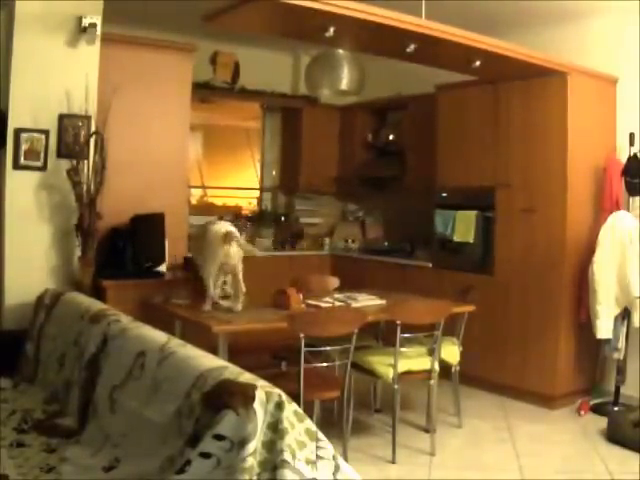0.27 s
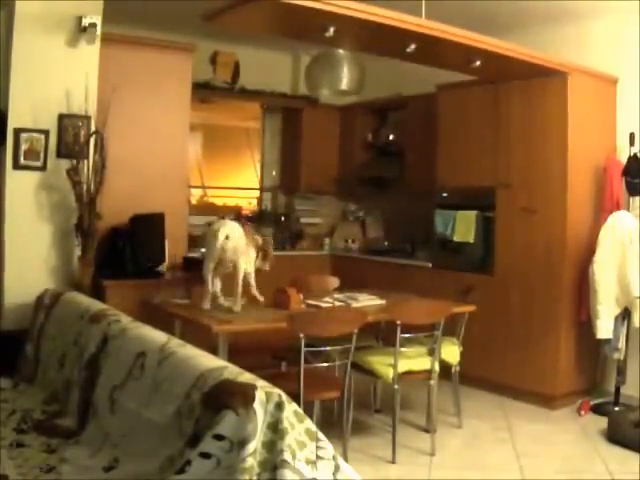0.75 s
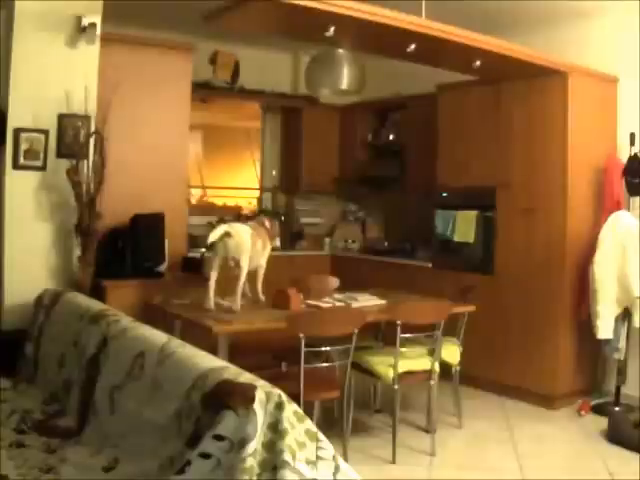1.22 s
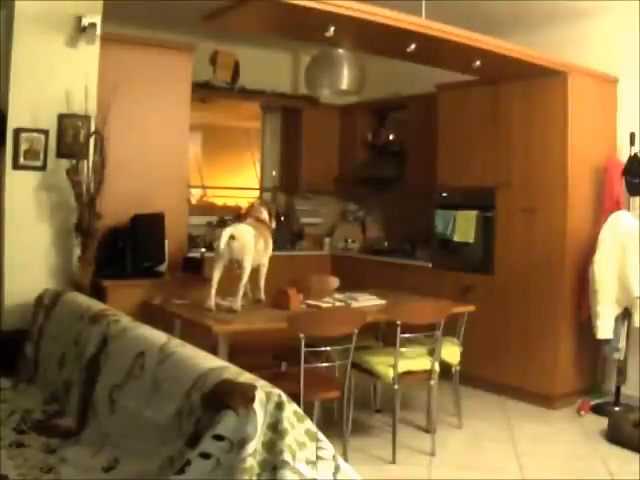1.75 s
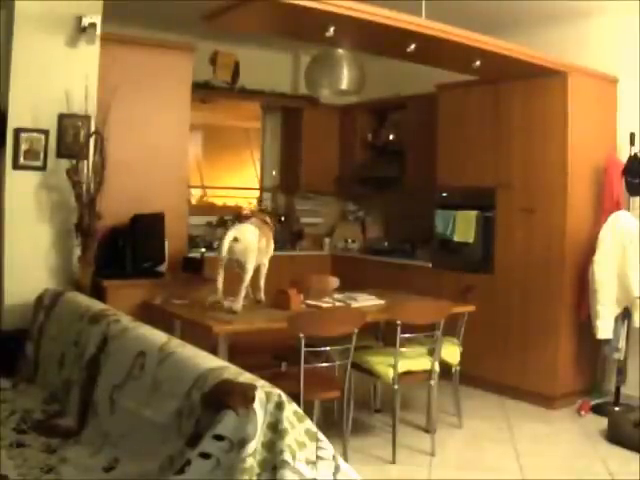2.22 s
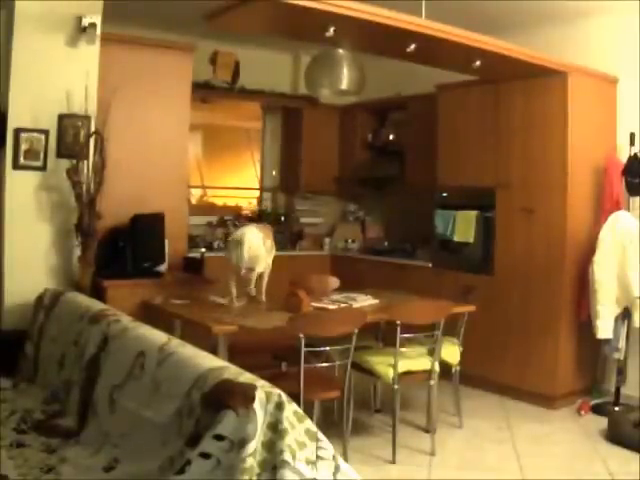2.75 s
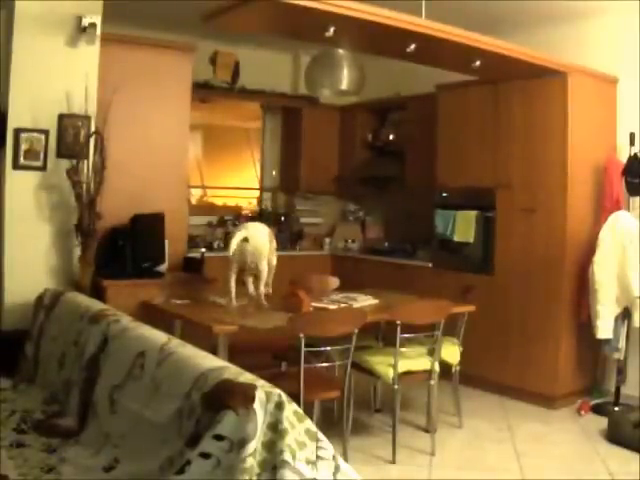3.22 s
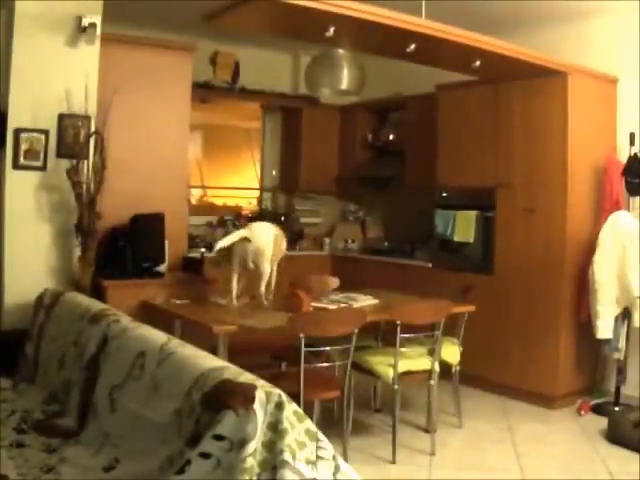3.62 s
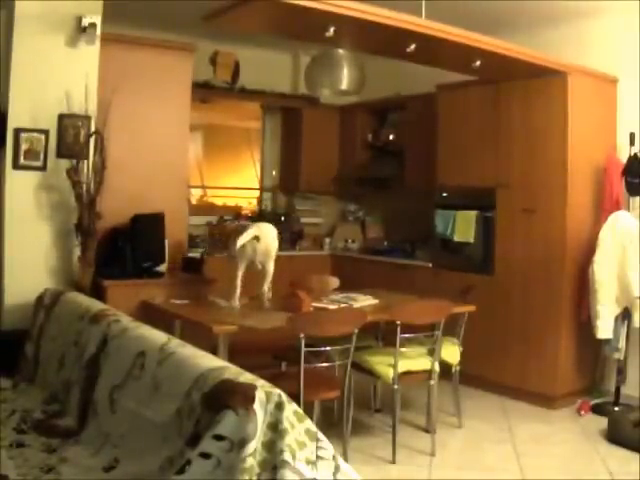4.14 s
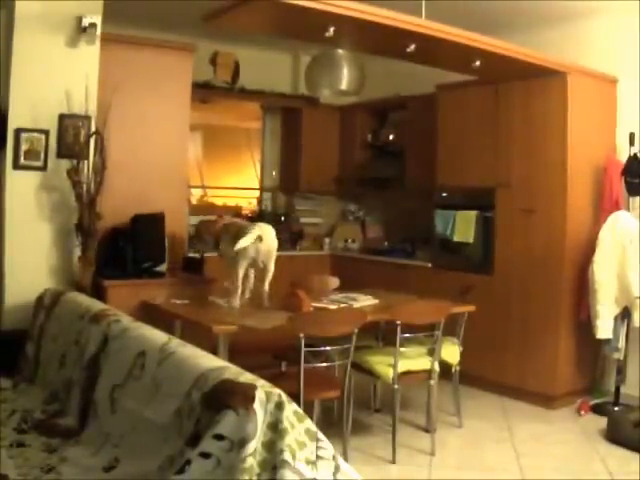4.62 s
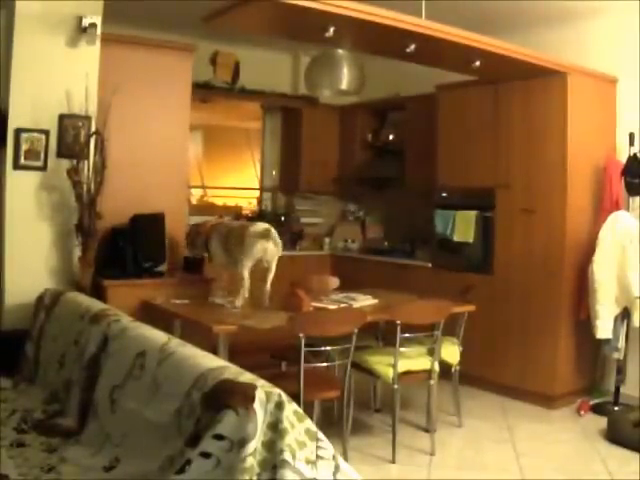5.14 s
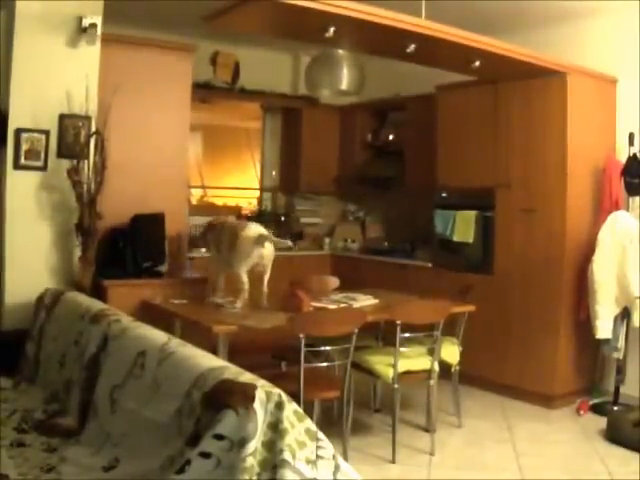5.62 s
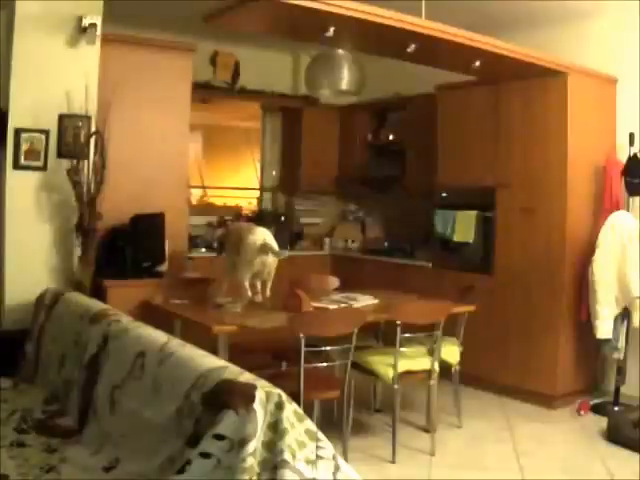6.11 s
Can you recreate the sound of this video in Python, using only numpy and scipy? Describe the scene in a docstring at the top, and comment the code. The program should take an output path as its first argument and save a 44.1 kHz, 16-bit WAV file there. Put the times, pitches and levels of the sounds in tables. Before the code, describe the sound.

A dog moves about on a wooden table, its claws clicking and its paws scuffing, with a faint jingle of its collar tag at first. It bumps and nudges things, with soft, low thumps from its paws. Louder knocks follow near the end, then a chink and a hollow object juddering across the wood. The microphone is several metres away in a quiet, slightly echoing kitchen with a faint hum.

```python
"""A dog moves about on a wooden table at the far side of a quiet, tiled kitchen and living room.
Over faint air and hum its claws click and scuff, its collar tag jingles and small things chink.
From 2.3 s it knocks and nudges things, and its paws make the furniture boom. More steps follow,
louder knocks from 5.3 s, and at 6 s it shoves a hollow thing that judders across the wood.
The microphone is metres away, so most of the sound comes by the walls."""
import sys
import numpy as np
from scipy import signal
from scipy.fft import rfft, irfft
from scipy.io import wavfile
from scipy.ndimage import uniform_filter1d

SR = 44100
rng = np.random.default_rng(int(sys.argv[2]) if len(sys.argv) > 2 else 0)


def bounce(signal):
    """Save signal as a 16-bit WAV file at the path given by the first command-line argument."""
    frames = np.transpose(np.atleast_2d(signal))
    limited = np.clip(frames, -1, 1)
    pcm = np.round(limited * 32767).astype(np.int16)
    wavfile.write(sys.argv[1], SR, pcm)


N = 280917
HIT_SAMPLES, RING_SAMPLES = 32768, 8192
TIME_S = np.arange(N) / SR
BINS_HZ = np.fft.rfftfreq(RING_SAMPLES, 1 / SR)

# table top resonances: f/Hz, width/Hz, gain/dB
TABLE_MODES = [(278, 30, -17), (956, 79, 6.5), (1130, 240, -1), (1438, 38, 2.5)]
# broad spectrum of things on the table: f/Hz, gain/dB
KNOCK_COLOUR = [(40, -37), (150, -18.5), (400, -5), (750, -0.5), (1500, 1), (2400, -1), (3500, -8),
                (5500, -14.5), (9000, -23.5), (15000, -22)]


def undb(db):
    """Decibels to gain."""
    return 10 ** (np.asarray(db) / 20)


def unit(x):
    """Scale to rms 1."""
    return x / np.sqrt(np.mean(x ** 2))


def along(hz, points):
    """Interpolate (f/Hz, value) points over log frequency."""
    points_hz, value = np.transpose(points)
    return np.interp(np.log(hz + 1), np.log(points_hz), value)


def peaks(modes):
    """Power response of resonances (f/Hz, width/Hz, gain/dB)."""
    return sum(undb(db) ** 2 / (1 + ((BINS_HZ ** 2 - hz ** 2) / ((BINS_HZ + 1) * width_hz)) ** 2)
               for hz, width_hz, db in modes)


def response(gain):
    """Minimum-phase ring with this gain per bin."""
    cepstrum = irfft(np.log(gain + 1e-9))
    cepstrum[1:RING_SAMPLES // 2] *= 2
    cepstrum[RING_SAMPLES // 2 + 1:] = 0
    return irfft(np.exp(rfft(cepstrum)))[:RING_SAMPLES // 2]


def body(colour, modes, tilt_db_per_oct=0, edge_hz=10):
    """Ring of an object: modes on a broad colour, falling away below the edge."""
    octaves = np.log2(np.maximum(BINS_HZ, 250) / 1500)
    low_cut = (BINS_HZ + 1) ** 2 / np.hypot(BINS_HZ ** 2, edge_hz ** 2)
    broad = undb(along(BINS_HZ, colour) + tilt_db_per_oct * octaves)
    return response(low_cut * broad * np.sqrt(1 + peaks(modes)))


def room_path(direct_db=-12, early_db=-5, early_s=0.018, echoes_per_s=800):
    """Spectrum of one path to the microphone: weak direct sound, early reflections, diffuse tail."""
    # reverberation: f/Hz, T60/s
    decay_times = [(125, 0.76), (500, 0.58), (2000, 0.63), (5000, 0.57), (10000, 0.56), (16000, 0.76)]
    hz, s, noise = signal.stft(rng.standard_normal(HIT_SAMPLES), SR, nperseg=256)
    decay = np.exp(-np.log(1000) * s / along(hz, decay_times)[:, None])
    tail = signal.istft(noise * decay, SR)[1][:HIT_SAMPLES]
    early = rng.standard_normal(HIT_SAMPLES) * (rng.random(HIT_SAMPLES) < echoes_per_s / SR)
    early *= np.exp(-np.arange(HIT_SAMPLES) / SR / early_s)
    path = tail / np.linalg.norm(tail) + undb(early_db) * early / np.linalg.norm(early)
    path[0] += undb(direct_db)
    spectrum = rfft(path)
    # walls add fine ripple, no broad colour
    return spectrum / np.sqrt(uniform_filter1d(np.abs(spectrum) ** 2, size=900))


PATHS = [room_path() for _ in range(12)]


def heard(force, ring):
    """A force rings an object; a random room path carries the sound."""
    path = PATHS[rng.integers(len(PATHS))]
    return irfft(rfft(force, HIT_SAMPLES) * rfft(ring, HIT_SAMPLES) * path)


def whiten(burst):
    """Flatten the spectrum, so the struck object sets the colour."""
    spectrum = rfft(burst, 2 * len(burst))
    return irfft(spectrum / (np.abs(spectrum) + 1e-9))[:len(burst)]


def strike(out, start_s, db, contact_s, ring, grit_db=4, rise_s=0.00064):
    """Add a blow: a short gritty contact rings an object; db is the level of the first 40 ms."""
    age_s = np.arange(RING_SAMPLES // 2) / SR
    noise, grit = rng.standard_normal((2, len(age_s)))
    envelope = np.exp(-age_s / max(contact_s, 1e-4)) * (1 - np.exp(-age_s / rise_s))
    sound = heard(whiten(noise * undb(grit_db * grit) * envelope), ring)
    start = max(int(start_s * SR), 0)
    sound = sound[:N - start] * undb(db) / np.std(sound[:int(.04 * SR)])
    out[start:start + len(sound)] += sound


def strokes(rows, attack_s, release_s, slope_db_per_s):
    """Sliding force: each stroke builds quickly, drifts in level, lets go."""
    force = np.zeros(N)
    for start_s, length_s, db in rows:
        age_s = np.maximum(TIME_S - start_s, 0)
        shape = np.minimum(age_s / attack_s, 1) * np.exp(-np.maximum(age_s - length_s, 0) / release_s)
        force = np.maximum(force, shape * undb(db + slope_db_per_s * np.minimum(age_s, length_s)))
    return force


def rub(force, ring, slips_per_s, scatter_db, block=16384):
    """Stick-slip: uneven jerks, scaled by the force, ring an object."""
    slips = rng.random(N) < slips_per_s / SR
    sizes = undb(scatter_db * np.clip(rng.standard_normal(N), -2, 2))
    jerks = unit(slips * sizes * rng.choice([-1, 1], N)) * force / np.linalg.norm(ring)
    out = np.zeros(N + HIT_SAMPLES)
    for start in range(0, N, block):  # moving contact, changing room path
        out[start:start + HIT_SAMPLES] += heard(jerks[start:start + block], ring)
    return out[:N]


def room_air(noise_db=-52, mains_hz=59.94, flutter_depth=0.17, hum_gain_db=-2):
    """Steady room noise and faint appliance hums; the hiss flutters at the mains rate."""
    # noise spectrum: f/Hz, relative density/dB
    air_colour = [(25, -15), (75, -18.5), (100, -10.5), (175, -10), (230, -5.5), (330, 0.5), (480, -3),
                  (620, -0.5), (1000, -3.5), (1400, -7), (2900, -13.5), (5200, -16.5), (10500, -22.5),
                  (15000, -26.5)]
    # appliance tones: f/Hz, level before hum gain/dB
    hum_tones = [(586.8, -62.5), (958.2, -64), (3510, -69.5), (3838, -72)]
    gain = undb(along(np.fft.rfftfreq(N, 1 / SR), air_colour))
    noise = unit(irfft(rfft(rng.standard_normal(N)) * gain, N))
    hiss = signal.sosfilt(signal.butter(1, 1500, "high", fs=SR, output="sos"), noise)
    mains_rad = 2 * np.pi * mains_hz * TIME_S
    flutter = flutter_depth * (np.cos(mains_rad) + np.cos(2 * mains_rad))
    hums = sum(undb(db + hum_gain_db) * np.sqrt(2) * np.sin(2 * np.pi * (hz * TIME_S + rng.random()))
               for hz, db in hum_tones)
    return undb(noise_db) * (noise + flutter * hiss) + hums


def claw_clicks(ring_width_hz=85):
    """Claws tick on the table top; each spot adds two rings of its own."""
    # t/s, level/dB, contact/s, tilt/(dB/oct), low edge/Hz, f1/Hz, gain1/dB, f2/Hz, gain2/dB
    clicks = [(.001, -40, 0.003, -1, 200, 1370, 2, 3030, 5),
              (0.407, -32, 0.0085, 3, 200, 2890, 9.5, 1430, 13.5),
              (.437, -37, 0.0042, .5, 200, 5100, 7, 1720, 6),
              (1.209, -39, 0.016, 1.5, 200, 1050, 8, 1260, 9),
              (3.35, -33.5, 0.0033, -2.5, 1920, 2340, 13, 1535, 13.5),
              (3.383, -41, 0.0072, 0, 1280, 2740, 12, 4740, 12),
              (3.601, -44.5, 0.016, 0, 200, 3320, 7, 4650, 5),
              (3.763, -34.5, 0.023, 1.7, 60, 3800, 7.5, 1000, 10),
              (4.225, -67, 0.00082, 4, 800, 3900, 16, 6500, 6),
              (4.370, -38, 0.0039, 1.2, 200, 2680, 10.5, 1520, 8),
              (4.522, -34, 0.0058, 1, 198, 1620, 11.5, 3180, 9),
              (4.555, -36.5, 0.011, 3, 200, 950, 15, 2730, 5),
              (4.881, -34.5, 0.0087, 2, 200, 1640, 13, 2540, 7),
              (4.901, -35, 0.0049, .5, 200, 4220, 4, 4430, 5)]
    # claw on wood: f/Hz, gain/dB
    claw_colour = [(40, -7), (150, -8), (300, -15.5), (600, -7.5), (950, -5), (2000, -1.5), (4500, -2.5),
                   (6500, -10.5), (10000, -16), (15000, -21.5)]
    out = np.zeros(N)
    for s, db, contact_s, tilt_db_per_oct, edge_hz, f1_hz, gain1_db, f2_hz, gain2_db in clicks:
        modes = TABLE_MODES + [(f1_hz, ring_width_hz, gain1_db), (f2_hz, ring_width_hz, gain2_db)]
        strike(out, s, db, contact_s, body(claw_colour, modes, tilt_db_per_oct, edge_hz))
    return out


def paw_scuffs():
    """Paws drag on the wood between steps."""
    # drags: t/s, length/s, level/dB
    scuffs = [(.212, 0.024, -41), (.325, 0.055, -44), (.58, 0.052, -46), (1.0, 0.043, -49),
              (2.48, 0.12, -45), (2.81, 0.086, -43), (2.888, 0.024, -39), (3.09, 0.056, -47),
              (3.137, 0.02, -38.5), (3.91, 0.088, -48), (4.685, 0.038, -46.5), (5.85, 0.17, -39),
              (5.99, 0.043, -18.5)]
    # friction spectrum: f/Hz, gain/dB
    scuff_colour = [(200, -23), (1000, -10.5), (2000, -4.5), (3000, -2.5), (4400, -4), (6500, -15),
                    (10000, -21), (15000, -20.5)]
    force = strokes(scuffs, attack_s=0.004, release_s=0.01, slope_db_per_s=-3)
    return rub(force, body(scuff_colour, TABLE_MODES, edge_hz=34), slips_per_s=930, scatter_db=8)


def tag_and_chinks(contact_s=0.0028, width_ratio=0.04, overtone_ratio=1.38, overtone_db=-3):
    """The collar tag and other hard things ring high, too small to radiate lows."""
    # tag strikes: t/s, level/dB
    jingles = [(.357, -47), (.378, -44.5), (.716, -59), (.842, -51), (.904, -54), (.938, -61.5)]
    # tag resonances: f/Hz, width/Hz, gain/dB
    tag_modes = [(6820, 74, -10), (7560, 130, -7.5), (9240, 110, -2.5), (10930, 26, 5), (13300, 70, -2),
                 (15260, 30, 0)]
    # small things touching: t/s, level/dB, f/Hz
    chinks = [(0.656, -53, 1214), (0.71, -51.5, 2640), (.843, -54.5, 3620), (1.015, -59, 2550),
              (5.985, -27, 10380), (6.0, -43, 10000)]
    out = np.zeros(N)
    radiation = BINS_HZ ** 2 / (BINS_HZ ** 2 + 3000 ** 2)
    for s, db in jingles:
        strike(out, s, db, contact_s, response(radiation * np.sqrt(peaks(tag_modes))))
    for s, db, hz in chinks:
        modes = [(hz, width_ratio * hz, 0), (hz * overtone_ratio, width_ratio * hz, overtone_db)]
        strike(out, s, db, contact_s, response(np.sqrt(peaks(modes))))
    return out


def table_knocks(ring_width_hz=70):
    """Bumped things knock on the table and ring with it."""
    # t/s, level/dB, contact/s, tilt/(dB/oct), ring f/Hz, ring gain/dB
    knocks = [(2.333, -39.5, 0.012, -0.5, 2040, 14), (2.372, -49, 0.097, 2, 2030, 14),
              (2.475, -36.5, 0.016, -1, 920, -2), (2.646, -30, 0.0021, -0.5, 2000, 22),
              (2.672, -34.5, 0.0024, 0, 2060, 8.5), (5.279, -44.5, 0.0096, -5.5, 1120, 12),
              (5.357, -44, 0.0021, 1.5, 970, 14), (5.409, -43, 0.0065, -0.5, 725, 24),
              (5.448, -32, 0.0026, -1, 1020, 17.5), (5.6, -31.5, 0.0024, -1.5, 1050, 20),
              (5.62, -34.5, 0.0036, 2, 907, 28), (5.688, -20.5, 0.005, -0.4, 1565, 11),
              (5.704, -20.5, 0.006, -0.7, 950, 14.5), (5.750, -26, 0.038, -1, 1630, 12.5)]
    out = np.zeros(N)
    for s, db, contact_s, tilt_db_per_oct, hz, ring_db in knocks:
        modes = TABLE_MODES + [(hz, ring_width_hz, ring_db)]
        strike(out, s, db, contact_s, body(KNOCK_COLOUR, modes, tilt_db_per_oct))
    return out


def nudges():
    """Lightly pushed things stick and slip along the table."""
    # light pushes: t/s, length/s, level/dB
    slides = [(2.35, 0.16, -41.5), (2.47, 0.098, -37), (2.58, 0.071, -40), (5.29, .39, -58),
              (5.76, 0.094, -34), (5.865, 0.028, -32), (5.9, 0.08, -32)]
    force = strokes(slides, attack_s=0.01, release_s=0.012, slope_db_per_s=2)
    return rub(force, body(KNOCK_COLOUR, TABLE_MODES, edge_hz=280), slips_per_s=420, scatter_db=7.5)


def paw_thumps(boom_width_hz=26, pad_hz=650, board_hz=130):
    """The dog's weight booms the furniture; pads pass no treble, boards radiate little deep bass."""
    # paw falls: t/s, level/dB, contact/s, f/Hz
    thumps = [(2.736, -47.5, 0.022, 407), (2.757, -52, 0.021, 227), (2.746, -60.5, 0.012, 135),
              (4.285, -48.5, 0.019, 414), (4.314, -64, 0.026, 403), (4.282, -57, 0.019, 216),
              (5.29, -45, 0.065, 398), (5.291, -48.5, .02, 231), (5.385, -49.5, 0.0071, 415),
              (5.467, -43.5, 0.016, 228), (5.641, -44, .008, 229)]
    out = np.zeros(N)
    pad = 1 / (1 + (BINS_HZ / pad_hz) ** 2)
    radiation = BINS_HZ ** 2 / (BINS_HZ ** 2 + board_hz ** 2)
    for s, db, contact_s, hz in thumps:
        boom = np.sqrt(peaks([(hz, boom_width_hz, 0)]))
        strike(out, s, db, contact_s, response(pad * radiation * boom))
    return out


def shove(ring_hz=960, ring_width_hz=170, ring_db=13):
    """A thing with a broad hollow ring sticks and slips across the wood and catches now and then."""
    # hard pushes: t/s, length/s, level/dB
    pushes = [(6.0, 0.021, -13.5), (6.035, 0.06, -16), (6.085, 0.048, -15.5), (6.145, .225, -16.5)]
    # hard catches: t/s, level/dB, contact/s
    catches = [(6.011, -19, 0.0028), (6.073, -26.5, 0.00085), (6.106, -24, 0.0031), (6.146, -30, 0.00073),
               (6.161, -24.5, 0.00063), (6.298, -26, 0.0015)]
    # its resonances: f/Hz, width/Hz, gain/dB
    hollow_modes = [(400, 12, -1), (622, 12, 5), (678, 11, 20.5), (849, 19, 11.5), (910, 33, 16),
                    (985, 67, 11.5), (1140, 44, 4), (1300, 24, 13), (2000, 72, 5), (2150, 33, 10.5),
                    (2637, 80, 9.5), (2930, 110, 5), (3860, 44, 4.5), (3710, 41, 9.5), (4200, 38, 11)]
    # its broad spectrum: f/Hz, gain/dB
    hollow_colour = [(30, -15), (80, -13), (150, -18.5), (400, -13), (700, -1.5), (1500, -1), (2700, -2),
                     (4300, -2), (6000, -6.5), (8000, -11), (10500, -13.5), (15000, -16)]
    ring = body(hollow_colour, hollow_modes + [(ring_hz, ring_width_hz, ring_db)])
    force = strokes(pushes, attack_s=0.0077, release_s=0.028, slope_db_per_s=-11)
    out = rub(force, ring, slips_per_s=450, scatter_db=5)
    for s, db, contact_s in catches:
        strike(out, s, db, contact_s, ring)
    return out


def scene():
    """All sources at the one microphone."""
    mix = room_air() + claw_clicks() + paw_scuffs() + tag_and_chinks()
    mix += table_knocks() + nudges() + paw_thumps() + shove()
    return mix[None]


def record(dry, shelf_hz=11050, shelf_db=-10, top_hz=15700):
    """The treble drops 10 dB above 11 kHz and is cut above 15.7 kHz."""
    hz = np.fft.rfftfreq(2 * N, 1 / SR)
    gain = undb(shelf_db * np.clip((hz - shelf_hz) / 100, 0, 1))
    dulled = irfft(rfft(dry, 2 * N) * gain)[:, :N]
    return signal.sosfilt(signal.ellip(10, .2, 80, top_hz, fs=SR, output="sos"), dulled)


dry = scene()
out = record(dry)
bounce(out)
```